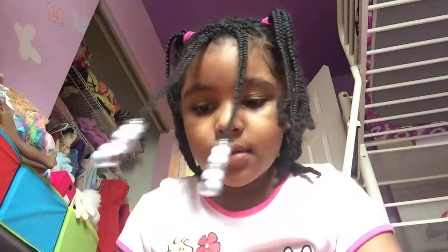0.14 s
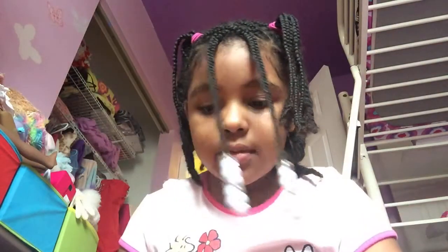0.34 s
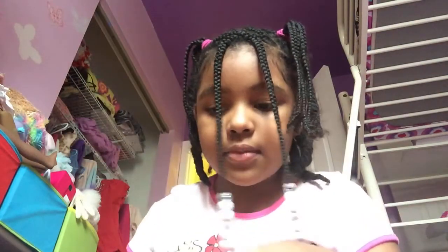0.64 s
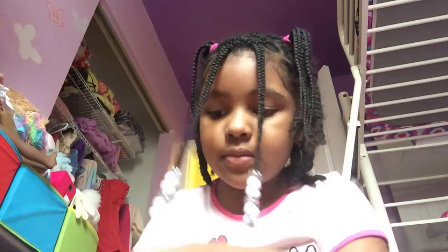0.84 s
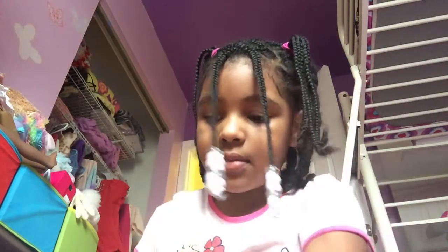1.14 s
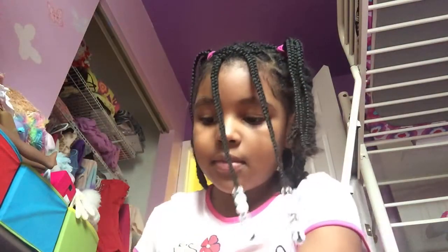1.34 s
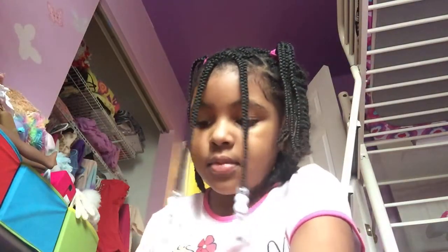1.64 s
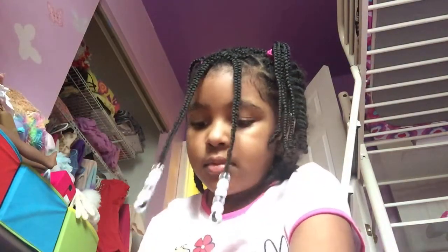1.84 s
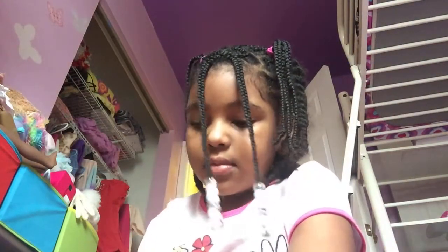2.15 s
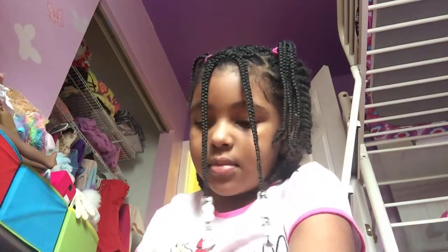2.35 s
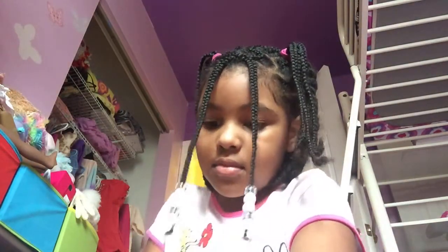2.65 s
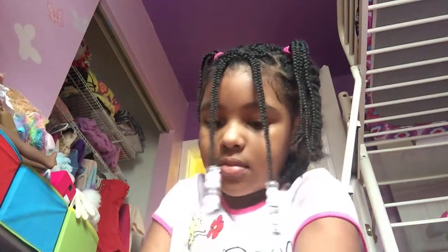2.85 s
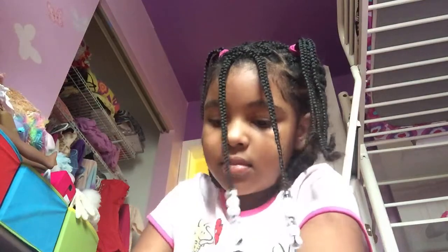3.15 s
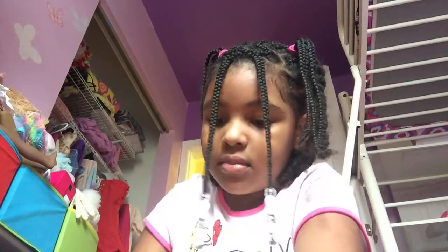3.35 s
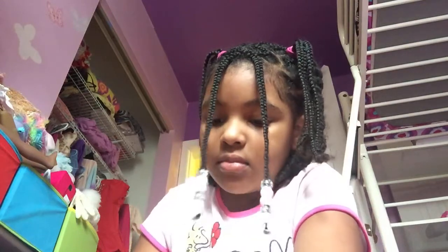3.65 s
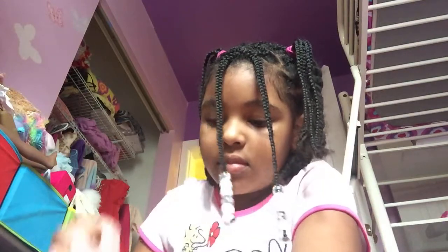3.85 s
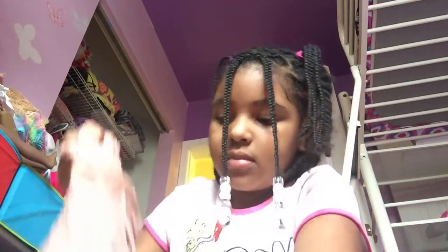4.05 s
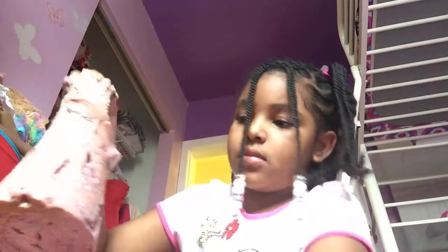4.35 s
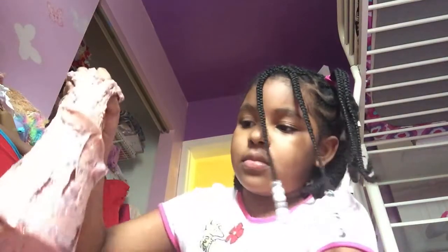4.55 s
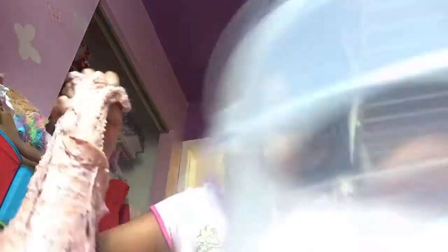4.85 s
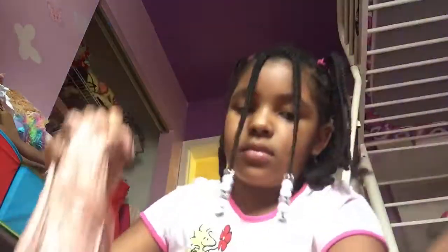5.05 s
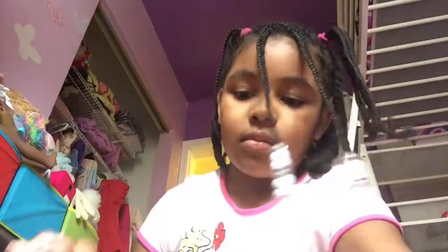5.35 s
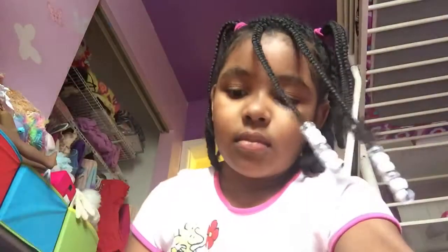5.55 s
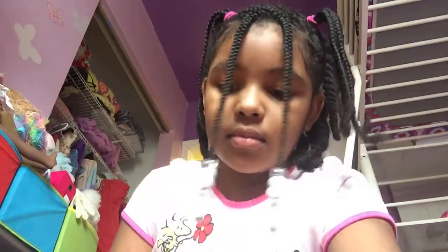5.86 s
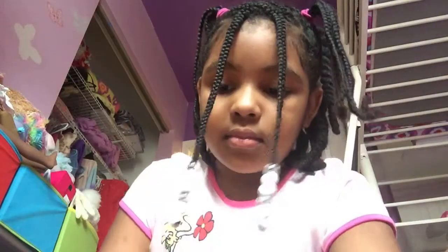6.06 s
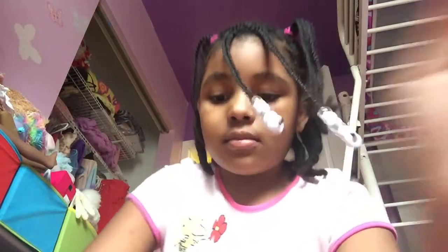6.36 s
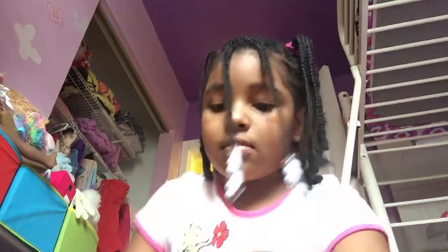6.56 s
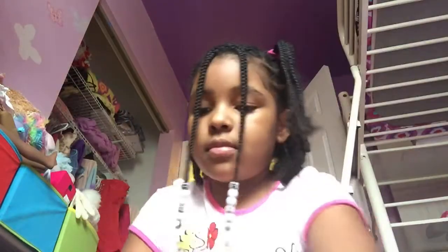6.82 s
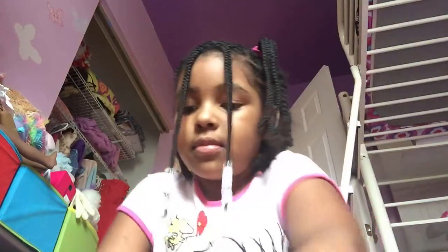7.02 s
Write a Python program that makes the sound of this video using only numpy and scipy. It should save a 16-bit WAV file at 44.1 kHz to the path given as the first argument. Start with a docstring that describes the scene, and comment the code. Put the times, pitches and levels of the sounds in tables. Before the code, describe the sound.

Plastic lid rattles faster and stops; faint rustles and knocks follow, then a loud hollow tub clatter and tiny bright clicks in a quiet bedroom.

```python
"""Plastic lid and tub on a desk

A plastic lid wobbles to rest on a desk, faster and faster. Hands rub, tap and drag a plastic tub, which is
dropped and bounces; hard beads click, metal is brushed once, in a small quiet bedroom. Lid, tub, desk and
metal are banks of damped modes driven by impulses and rough noise; contacts add noise bursts, sliding adds
hiss, beads ring as short sines. A diffuse tail and steady air noise make the room.
"""
import sys
import numpy as np
from scipy import signal
from scipy.fft import rfft, irfft, next_fast_len
from scipy.io import wavfile
from scipy.ndimage import uniform_filter1d

SR = 44100
rng = np.random.default_rng(int(sys.argv[2]) if len(sys.argv) > 2 else 0)


def inscribe(sig):
    """Save sig as 16-bit PCM at rate SR to the path in sys.argv[1].

    A 1-D sig is mono; a 2-D sig holds one channel per row.
    Samples are clipped to [-1, 1] before scaling.
    """
    pcm = np.round(np.clip(np.atleast_2d(sig).T, -1, 1) * 32767)
    wavfile.write(sys.argv[1], SR, pcm.astype(np.int16))


N = 317079

# colour of hard plastic contacts: (frequency [Hz], relative density [dB per Hz])
CRACK_COLOUR = [(880, -29), (1500, -1), (2690, -3.5), (5280, -10.5), (6000, -10), (11000, -30),
                (12700, -26), (16000, -39)]
# hands shifting about the tub: (time [s], base level [dB])
FIDGET_LEVEL = [(0.76, -67), (0.87, -72.5), (1.42, -70.5), (1.98, -83.5), (2.17, -68.5), (3.59, -70),
                (3.72, -94.5), (3.96, -76.5), (4.18, -76), (4.34, -87.5), (4.84, -73), (5.18, -57),
                (5.27, -66), (5.49, -78), (5.86, -78.5), (6.69, -78.5), (6.97, -67.5), (7.19, -76.5)]


def undb(db):
    """Gain of a level in dB."""
    return 10 ** (np.asarray(db) / 20)


def curve(table, column):
    """Gain over time from a dB column; silent outside the table."""
    rows = np.array(table)
    t = np.arange(N) / SR
    return undb(np.interp(t, rows[:, 0], rows[:, column], left=-200, right=-200))


def noise(colour):
    """Noise of rms 1, shaped in frequency by the given colour."""
    hz, db = np.transpose(colour)
    size = next_fast_len(N)
    bin_hz = np.maximum(np.arange(size // 2 + 1) * SR / size, 1)
    gain = undb(np.interp(np.log(bin_hz), np.log(hz), db))
    x = irfft(rfft(rng.standard_normal(size)) * gain, size)[:N]
    return x / x.std()


def grit(scatter_db, grain_s):
    """Rough contact: a gain of rms 1 that jumps from grain to grain."""
    grain = max(int(grain_s * SR), 2)
    jumps_db = scatter_db * np.minimum(rng.exponential(size=N // grain + 1), 3.5)
    gain = np.repeat(undb(jumps_db), grain)[:N]
    gain = uniform_filter1d(gain, grain)
    return gain / np.sqrt(np.mean(gain ** 2))


def spikes(s, size):
    """One impulse at each time."""
    x = np.zeros(N)
    np.add.at(x, np.minimum((s * SR).astype(int), N - 1), size)
    return x


def after(s, db, decay_s):
    """Gain that jumps at each blow and dies away exponentially."""
    return signal.lfilter([1], [1, -np.exp(-1 / (decay_s * SR))], spikes(s, undb(db)))


def stroke(s, length_s, swell_db_per_s, attack_db_per_s, release_db_per_s):
    """Gain of one movement: a rise, a hold that may swell, a fall, all straight in dB."""
    t = np.arange(N) / SR - s
    swell = swell_db_per_s * np.clip(t, 0, length_s)
    attack = attack_db_per_s * np.maximum(-t, 0)
    release = release_db_per_s * np.maximum(t - length_s, 0)
    return undb(swell - attack - release)


def mode(x, hz, width_hz):
    """A damped vibration whose answer to a unit impulse has amplitude 1."""
    w, r = 2 * np.pi * hz / SR, np.exp(-np.pi * width_hz / SR)
    return signal.lfilter([0, np.sin(w)], [1, -2 * r * np.cos(w), r * r], x)


def body(modes, s, blow_db, lean, rub, spread_db, contact_s):
    """Blows and rubbing ring one set of modes; lean and rub give the strength for a mode's pitch."""
    hz, width_hz, db = np.transpose(modes)
    share = undb(db) * width_hz  # a wide peak needs a larger swing for the same height
    spread = undb(spread_db * rng.standard_normal((len(s), len(hz))))
    swing = share * lean(hz[:, None]).T * spread
    swing = swing * (undb(blow_db) / np.sqrt(np.sum(swing ** 2, axis=1)))[:, None]
    rough = rng.standard_normal(N) / np.sqrt(np.sum(share ** 2 * SR / (4 * np.pi * width_hz)))
    push = np.hanning(int(contact_s * SR) + 3)
    push = push / push.sum()
    out = 0
    for k in range(len(hz)):
        blows = np.convolve(spikes(s, swing[:, k]), push)[:N]
        force = blows + share[k] * rub(hz[k]) * rough
        out = out + mode(force, hz[k], width_hz[k])
    return out


def crack(s, db, colour, rise_s, decay_s, tail_s, tail_db, dulling):
    """A noise burst and fainter rattle at each contact; weaker contacts lose more treble."""
    dull_hz = 3700
    rise = np.hanning(int(rise_s * SR) + 3)
    rise = rise / rise.sum()
    full = noise(colour)
    low = signal.sosfilt(signal.butter(2, dull_hz, fs=SR, output="sos"), full)
    high_db = db + dulling * (db - db.max())
    out = 0
    for part, part_db in ((low, db), (full - low, high_db)):
        hits = np.convolve(spikes(s, undb(part_db)), rise)[:N]
        for t, gain in ((decay_s, 1), (tail_s, undb(tail_db))):
            out = out + gain * part * signal.lfilter([1], [1, -np.exp(-1 / (t * SR))], hits)
    return out


def favour(hz, spot_hz, far_db):
    """Modes near the pitch of the spot touched ring the most; distant ones get a floor."""
    reach_oct = 0.11
    return np.exp(-(np.log2(hz / spot_hz) / reach_oct) ** 2) + undb(far_db)


def air():
    """The quiet of the room: a low lumpy rumble, a little hiss and a thin high whine."""
    # (frequency [Hz], relative density [dB per Hz])
    air_colour = [(28, -34.5), (52, 1.5), (132, 1.5), (212, -4), (432, -19), (593, -19), (1150, -32.5),
                  (2740, -28.5), (4290, -31.5), (6380, -24.5), (7670, -38.5), (12300, -29.5),
                  (14800, -37.5), (16500, -57.5)]
    air_db, whine_db = -64.5, -89.5
    whine = mode(rng.standard_normal(N), hz=10600, width_hz=60)
    rumble_hiss = undb(air_db) * grit(scatter_db=1.0, grain_s=0.06) * noise(air_colour)
    return rumble_hiss + undb(whine_db) * whine / whine.std()


def room(x):
    """Soft furnishings: a short diffuse tail, duller than the direct sound."""
    t60_s, build_s, tail_db = 0.11, 0.006, -13
    t = np.arange(SR // 2) / SR
    tail = rng.standard_normal(len(t)) * 1000.0 ** (-t / t60_s) * np.minimum(t / build_s, 1)
    tail = signal.lfilter([1], [1, -0.35], tail)  # dulls the tail
    tail = tail / np.sqrt(np.sum(tail ** 2))
    return x + undb(tail_db) * signal.fftconvolve(x, tail)[:N]


def metal():
    """One light brush keeps thin high modes ringing for a moment, each flaring on its own."""
    # (frequency [Hz], width [Hz], relative level [dB])
    metal_modes = [(2270, 74, -7.5), (3100, 55, -12), (3290, 54, -1), (3940, 55, -10), (4500, 38, -4),
                   (4780, 37, 0.5), (5190, 45, -6), (5750, 16, -2), (6250, 40, -3), (7080, 63, -11),
                   (7770, 19, -16), (8700, 99, -13), (9900, 22, -13), (10300, 130, -39), (11660, 41, -14),
                   (12300, 37, -30)]
    brush_db = -57
    brush = undb(brush_db) * stroke(s=1.956, length_s=0.044, swell_db_per_s=0,
                                    attack_db_per_s=1200, release_db_per_s=112)
    no_blows = np.zeros(0)

    def rub(hz):
        return brush * grit(scatter_db=1.0, grain_s=0.008)

    return body(metal_modes, no_blows, no_blows, np.ones_like, rub, spread_db=0, contact_s=0)


def beads():
    """Each click is a sharp tick and a very short ring; faint strays fall at chance moments."""
    # (time [s], base level [dB], ring [Hz])
    clicks = [(0.8825, -59, 4060), (1.066, -44, 8600), (2.5219, -45.5, 5030), (2.6721, -45.5, 5800),
              (2.882, -51, 8960), (2.8943, -50, 3290), (3.5018, -50.5, 3480), (4.9153, -22, 3196),
              (5.7074, -52, 6120), (5.9346, -56, 6810), (6.399, -61, 6230), (6.5757, -52.5, 1505),
              (6.5944, -58, 6450), (6.694, -62, 6050), (6.751, -47, 3390), (6.8096, -40, 6000),
              (6.8458, -39, 8900), (6.8725, -43, 4090), (6.888, -27, 8900), (6.9314, -51, 9100),
              (6.9503, -27, 9220), (6.965, -59.5, 6000), (6.9808, -46, 9100), (6.9957, -58, 8740),
              (7.01, -51, 5760), (7.0803, -47, 8980), (7.118, -35, 8870), (7.1674, -52, 9540)]
    # (frequency [Hz], relative density [dB per Hz])
    tick_colour = [(710, -67), (1200, -23.5), (4000, -17.5), (4550, -17.5), (5970, -6), (8000, -14.5),
                   (8910, -12.5), (16000, -20)]
    stray_per_s, stray_db, stray_hz = 5.4, 2, 4453  # least level over the shifting hands; centre pitch
    ring_db, snap_db, ring_decay_s = -2.5, 8.5, 0.0012

    when, size, tone = rng.random((int(stray_per_s * N / SR), 3)).T
    when = when * N / SR
    busy_db = np.interp(when, *np.transpose(FIDGET_LEVEL), left=-90)
    strayed_db = busy_db + stray_db + 6.0 * size
    strayed_hz = stray_hz * 2 ** (2 * tone - 1)  # within an octave either way
    strays = np.transpose([when, strayed_db, strayed_hz])
    s, db, hz = np.concatenate([clicks, strays]).T

    t = np.arange(400) / SR
    rings = undb(db + ring_db)[:, None] * np.sin(2 * np.pi * hz[:, None] * t) * np.exp(-t / ring_decay_s)
    rings[:, :2] += undb(db + snap_db)[:, None] * [1, -1]  # the snap of two hard surfaces
    out = np.zeros(N + len(t))
    np.add.at(out, (s * SR).astype(int)[:, None] + np.arange(len(t)), rings)
    ticks = crack(s, db, tick_colour, rise_s=0.00035, decay_s=0.0008,
                  tail_s=0.012, tail_db=-15.0, dulling=0.05)
    return out[:N] + ticks


def lid():
    """The rim rolls round the desk, louder as it quickens, and chatters after each slap."""
    # rim meeting the desk: (time [s], ring level [dB], crack level [dB])
    wobble = [(0.0066, -20, -17.5), (0.0226, -27.5, -26), (0.0943, -20, -21.5), (0.1069, -20.5, -23.5),
              (0.115, -23, -16), (0.1225, -15, -23), (0.193, -31.5, -31.5), (0.218, -25, -19),
              (0.23, -16, -19), (0.2423, -15, -11.5), (0.325, -18, -25.5), (0.3334, -14, -14),
              (0.3515, -24, -20), (0.3836, -22.5, -34), (0.4103, -22, -18.5), (0.4173, -13, -12.5),
              (0.4472, -20, -34.5), (0.456, -22, -32), (0.4826, -21, -22), (0.4919, -14, -13.5),
              (0.5147, -21, -26), (0.5452, -17, -24.5), (0.556, -17, -17), (0.576, -14.5, -23),
              (0.6011, -20.5, -16.5), (0.6127, -19, -14.5), (0.6403, -19, -28), (0.65, -17.5, -17.5),
              (0.6579, -33.5, -19), (0.675, -14, -18), (0.6872, -16, -18.5), (0.6957, -49, -18.5),
              (0.7111, -24, -23), (0.7229, -14.5, -21.5)]
    # (frequency [Hz], width [Hz], relative level [dB])
    lid_modes = [(130, 50, -19), (312, 45, -13), (533, 60, -12), (883, 85, -1), (1085, 75, 1),
                 (1180, 80, -2), (1520, 100, -7), (2090, 90, -10), (3120, 70, -15), (4060, 160, -20),
                 (4450, 120, -20), (4960, 130, -21), (5880, 95, -21), (6610, 210, -25)]
    roll_db, roll_top_hz = -36, 1500  # level at the start
    chatter_db, chatter_s = -10.5, 0.009

    s, ring_db, crack_db = np.transpose(wobble)
    rolling = undb(roll_db) * stroke(s=0, length_s=0.7315, swell_db_per_s=3.5,
                                     attack_db_per_s=0, release_db_per_s=508)
    chatter = after(s, ring_db + chatter_db, chatter_s)
    roll = (rolling + chatter) * grit(scatter_db=3.5, grain_s=0.0021)

    def rub(hz):
        return roll / (1 + (hz / roll_top_hz) ** 2)

    ring = body(lid_modes, s, ring_db, np.ones_like, rub, spread_db=6.5, contact_s=0.0004)
    slaps = crack(s, crack_db, CRACK_COLOUR, rise_s=0.0016, decay_s=0.00071,
                  tail_s=0.004, tail_db=-11.0, dulling=0.65)
    return ring + slaps


def drag(s, length_s, peak):
    """Gain of one stroke: pressure builds to its peak and eases off, between steep ends."""
    arch_db = 8  # how far the ends lie under the peak
    u = (np.arange(N) / SR - s) / length_s
    arch = np.interp(u, [0, np.clip(peak, 0.05, 0.95), 1], [-arch_db, 0, -arch_db])
    return undb(arch) * stroke(s, length_s, swell_db_per_s=0, attack_db_per_s=718, release_db_per_s=611)


def tub():
    """Wall and desk modes answer to blows and to sliding; skin and plastic hiss as they slide."""
    # blows: (time [s], base wall level [dB], desk level [dB], crack level [dB], pitch of the spot [Hz])
    knocks = [(0.981, -40.5, -44.5, -81, 607), (1.149, -43, -54, -65, 630), (1.213, -40, -40, -55.5, 630),
              (2.226, -59, -50, -93, 610), (2.329, -34, -47, -53, 1020), (2.397, -29, -34.5, -58, 980),
              (2.404, -27.5, -42, -40.5, 2730), (2.5, -32, -37, -60, 613), (2.503, -36, -60, -60, 1460),
              (2.613, -48, -103, -45.5, 1660), (2.703, -38.5, -63, -53.5, 995),
              (2.728, -41, -46.5, -49, 643), (3.169, -27.5, -36.5, -80, 850), (3.196, -45, -30, -67, 610),
              (3.333, -50, -43.5, -76, 530), (3.597, -21, -37.5, -49.5, 980),
              (3.906, -43, -50.5, -54.5, 602), (4.101, -14.5, -38, -44.5, 690),
              (4.105, -7, -24.5, -48, 640), (4.639, -74, -44, -68, 1770), (4.907, -27, -30, -29, 650),
              (4.916, -17.5, -26.5, -25, 550), (5.038, 1, -10.5, -15.5, 900), (5.145, -12, -51, -47, 908),
              (5.209, -10, -28, -26, 710), (5.216, -12.5, -18, -25.5, 740), (5.226, -8, -24, -18.5, 1930),
              (5.26, -18.5, -31.5, -30.5, 760), (5.276, -13.5, -26, -23, 773), (5.297, -15, -33, -28, 814),
              (5.33, -24, -35, -40.5, 754), (5.361, -22.5, -34, -40, 765), (5.374, -36.5, -61, -42.5, 711),
              (5.394, -49, -59, -44.5, 1660), (5.406, -27.5, -59, -49, 760), (5.431, -40, -44.5, -55, 732),
              (5.457, -34, -48.5, -50, 712), (5.497, -41.5, -51, -47, 1667),
              (5.675, -45.5, -52, -51.5, 694), (5.757, -40.5, -56, -61, 1000),
              (6.894, -24.5, -41, -68, 564)]
    # (start [s], length [s], peak pressure [0-1 of length], desk [dB], wall [dB], hiss [dB], wall pitch [Hz])
    drags = [(1.155, 0.07, 0.45, -52, -64, -64, 750), (2.984, 0.068, 0.7, -67, -58.5, -67.5, 686),
             (3.122, 0.16, 0.67, -46.5, -39.5, -51, 897), (3.411, 0.19, 0.61, -55.5, -41.5, -57, 907),
             (3.659, 0.076, 0.42, -45.5, -45, -58, 583), (4.03, 0.091, 0.97, -51, -39.5, -58, 880),
             (4.112, 0.11, 0.74, -37, -40.5, -55.5, 640), (4.209, 0.11, 0.52, -25, -29, -53.5, 647),
             (6.142, 0.13, 0.63, -43, -50, -51, 608), (6.743, 0.21, .6, -56, -65.5, -58, 713)]
    # (frequency [Hz], width [Hz], relative level [dB])
    wall_modes = [(540, 90, -5), (630, 75, 0), (690, 55, 0), (745, 32, 6), (870, 95, -4), (985, 95, -4),
                  (1340, 60, -8), (1460, 70, -6), (1960, 70, -8), (2400, 90, -14), (2900, 90, -12),
                  (3300, 90, -15)]
    desk_modes = [(150, 40, -0.5), (223.5, 33, 4), (287, 38, -13)]
    # sliding on the desk, and in the hands: (frequency [Hz], relative density [dB per Hz])
    hiss_colour = [(880, -10), (1500, -0.5), (2100, -5.5), (3660, -7), (3960, -8.5), (6760, -9),
                   (7840, -20), (8740, -11), (12500, -26.5), (16000, -27.5)]
    rustle_colour = [(530, -30.5), (900, 0.5), (1150, -3.5), (1490, -0.5), (2140, -5), (7770, -13),
                     (9090, -10.5), (16000, -29.5)]
    desk_hz, held_hz = 237, 740  # held_hz: wall pitch that rings on while the tub is held
    fidget_desk_db, fidget_wall_db, fidget_hiss_db = 1.5, -10.5, -1.5
    rock_db, rock_s = -27.5, 0.015  # the tub rocks on after each blow
    far_db = -28  # what modes far from the dragged pitch still get

    s, wall_db, desk_db, crack_db, spot_hz = np.transpose(knocks)
    start, length, peak, *levels_db, pitch_hz = np.transpose(drags)
    strokes = np.array([drag(*row) for row in zip(start, length, peak)])
    stick_slip = grit(scatter_db=3.0, grain_s=0.0023) * grit(scatter_db=1.8, grain_s=0.0085)
    desk, wall, hiss = undb(levels_db) @ strokes * stick_slip
    drag_hz = pitch_hz[np.argmax(strokes, axis=0)]

    touch = grit(scatter_db=4.5, grain_s=0.0039)
    fidget = touch * curve(FIDGET_LEVEL, column=1)
    desk_rub = undb(fidget_desk_db) * fidget + touch * after(s, desk_db + rock_db + 9.5, rock_s)
    hands = undb(fidget_wall_db) * fidget
    rocking = touch * after(s, wall_db + rock_db, rock_s)
    rustle = undb(fidget_hiss_db) * fidget + touch * after(s, crack_db + rock_db, rock_s)
    last_hz = spot_hz[np.searchsorted(s, np.arange(N) / SR) - 1]  # the spot struck last rings on
    hard_db = 0.51 * (crack_db - wall_db) - 10.0  # a hard, cracking blow reaches all the modes

    def wall_rub(hz):
        dragged = wall * favour(hz, drag_hz, far_db)
        held = hands * favour(hz, held_hz, -10.0)
        return dragged + held + rocking * favour(hz, last_hz, -8.0)

    def desk_drag(hz):
        return desk * favour(hz, desk_hz, -50.0) + desk_rub

    ring = body(wall_modes, s, wall_db - 9.0, lambda hz: favour(hz, spot_hz, hard_db),
                wall_rub, spread_db=4.0, contact_s=0.00044)
    thud = body(desk_modes, s, desk_db, lambda hz: favour(hz, desk_hz, -9.0),
                desk_drag, spread_db=3.0, contact_s=0.0023)
    sliding = hiss * noise(hiss_colour) + rustle * noise(rustle_colour)
    cracks = crack(s, crack_db, CRACK_COLOUR, rise_s=0.0036, decay_s=0.0021,
                   tail_s=0.0036, tail_db=-3.5, dulling=0.088)
    return ring + thud + sliding + cracks


def scene():
    """Everything near one microphone; small things radiate little deep bass."""
    bass_hz = 105
    things = lid() + tub() + beads() + metal()
    things = signal.sosfilt(signal.butter(3, bass_hz, "high", fs=SR, output="sos"), things)
    return (room(things) + air())[None]


def record(dry):
    """The recorder cuts the top steeply."""
    top_hz = 16800
    return signal.sosfilt(signal.cheby2(16, 90, top_hz, fs=SR, output="sos"), dry)


dry = scene()
out = record(dry)
inscribe(out)
```